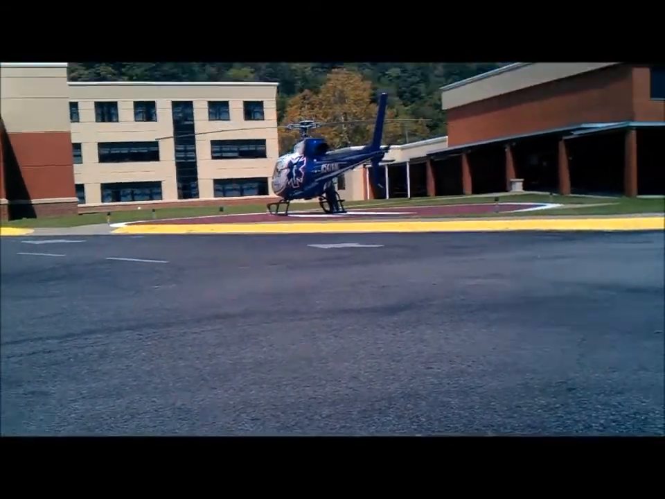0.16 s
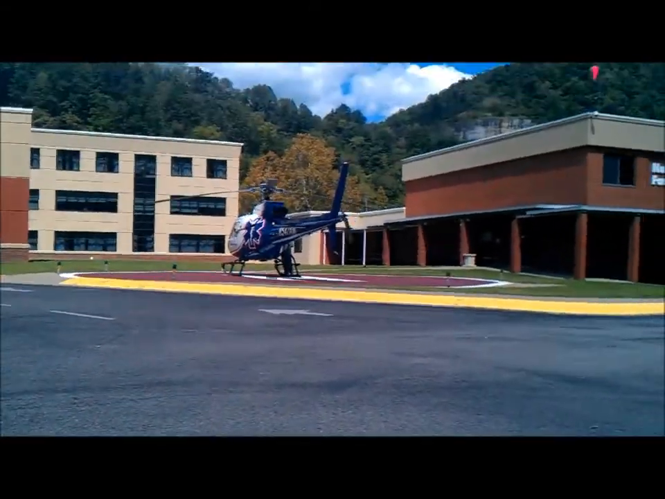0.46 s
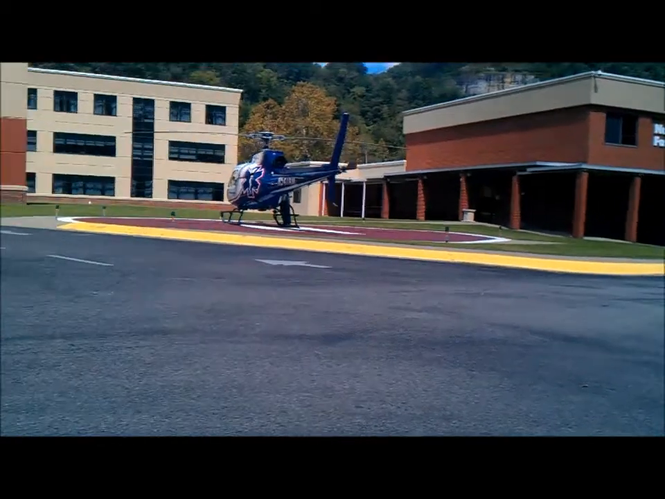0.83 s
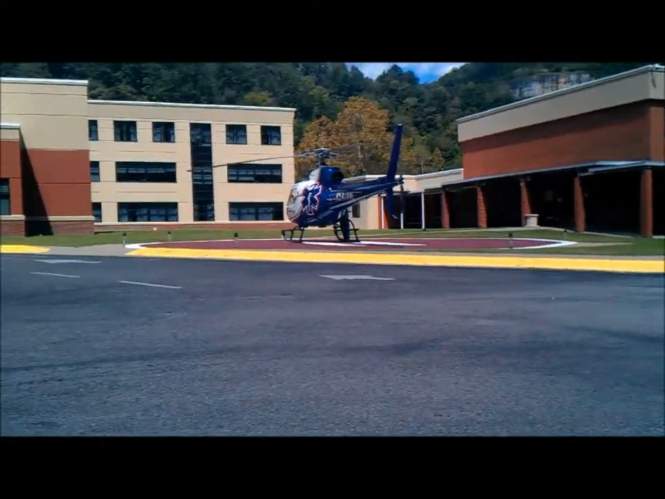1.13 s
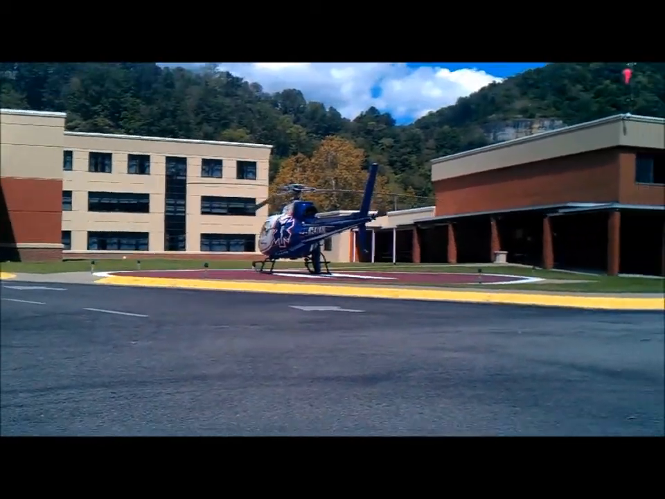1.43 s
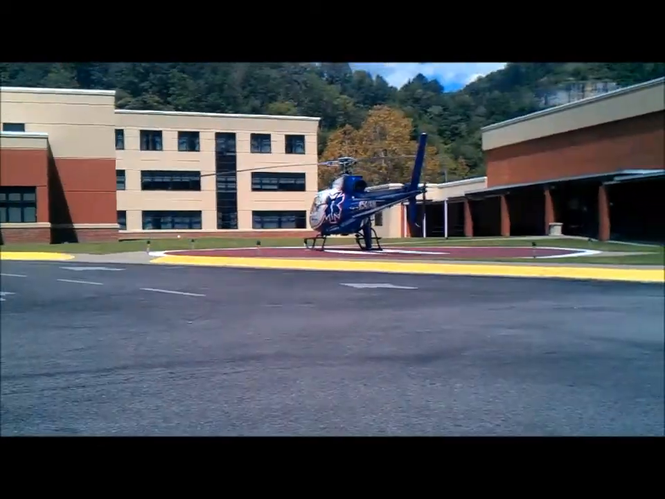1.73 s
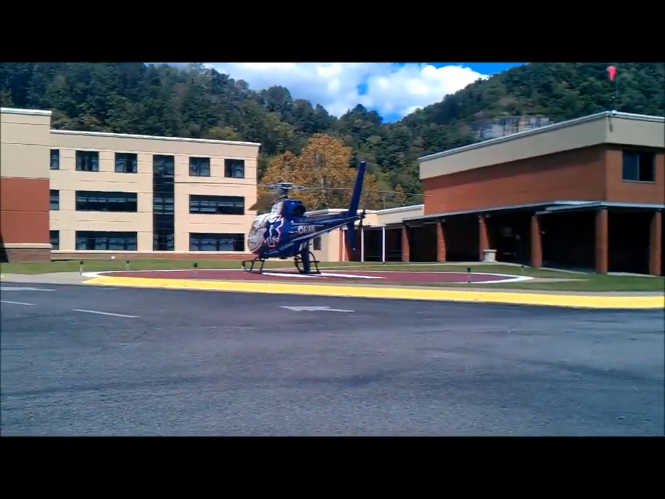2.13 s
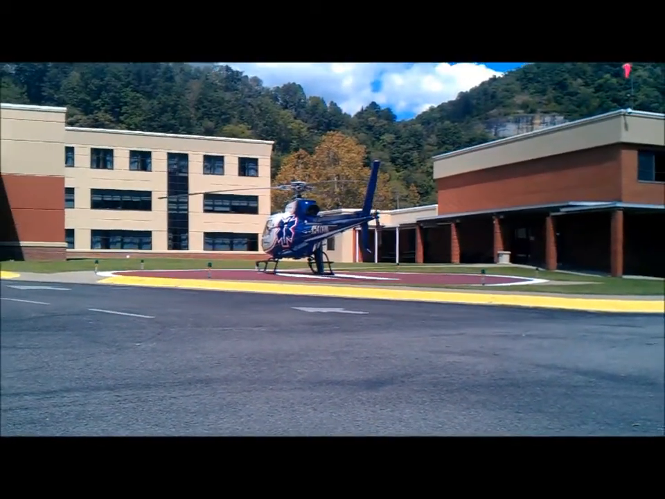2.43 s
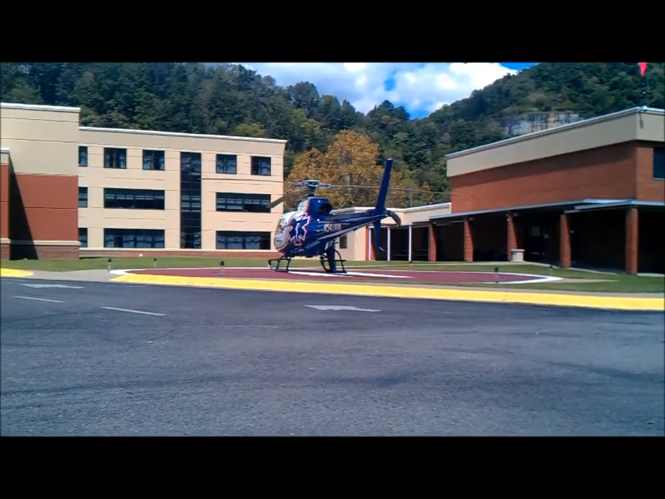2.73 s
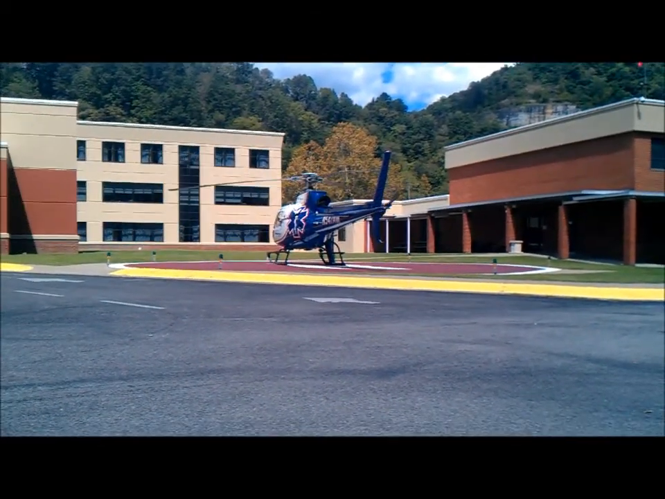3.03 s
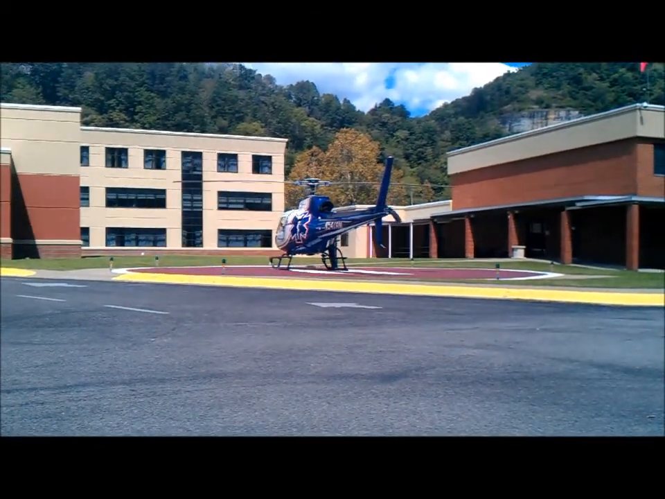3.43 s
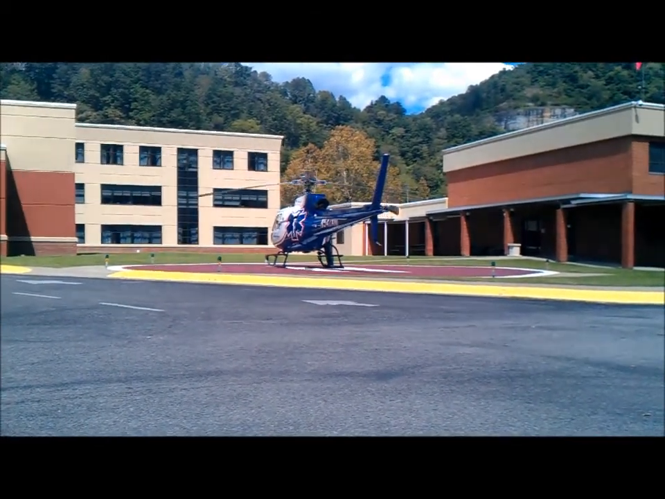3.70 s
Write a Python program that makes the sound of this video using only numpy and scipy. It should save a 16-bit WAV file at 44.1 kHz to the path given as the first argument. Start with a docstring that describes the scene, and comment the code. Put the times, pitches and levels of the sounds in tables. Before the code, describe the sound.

Helicopter turbine engine spools up outdoors, a harsh rising whine over a broad steady roar

```python
"""Helicopter spool-up

A parked helicopter spools up across a wide paved lot, heard on a hand-held mono camera.
Blade rows whine at multiples of the rising shaft speed, as wandering lines with noisy halos.
Burner rumble is a fuzzy low line; exhaust roar is shaped noise. The ground echo cuts hollows in the
roar that slide as the camera moves; faint gliding lines and a thin hum lie beneath."""
import sys
import numpy as np
from scipy import signal
from scipy.fft import rfft, irfft
from scipy.io import wavfile
from scipy.ndimage import uniform_filter1d

SR = 44100
rng = np.random.default_rng(int(sys.argv[2]) if len(sys.argv) > 2 else 0)


def log_audio(samples):
    """Write samples as a 16-bit WAV file to the path given in sys.argv[1]."""
    # one column per channel
    frames = np.atleast_2d(samples).T
    # limit to full scale, then quantise
    limited = np.clip(frames, -1, 1)
    pcm = np.round(limited * 32767).astype(np.int16)
    wavfile.write(sys.argv[1], SR, pcm)


N = 170226

# common time points of slow level changes: [t/s]
SLOW_TIMES_S = [0, 1.3, 2.3, 3.86]


def amp(db):
    """dB to amplitude factor."""
    return 10 ** (np.asarray(db) / 20)


def evened(x):
    """Scale to rms 1."""
    return x / np.sqrt(np.mean(np.abs(x) ** 2) + 1e-20)


def curve(table, t):
    """Every column of a time table, read at times t."""
    rows = np.transpose(table)
    return [np.interp(t, rows[0], column) for column in rows[1:]]


def bell(hz, centre_hz, half_width_oct):
    """Gaussian weight on a log-frequency axis, 1 at the centre, 1/e at the half width."""
    return np.exp(-(np.log2(hz / centre_hz) / half_width_oct) ** 2)


def drift(width_hz):
    """Slow complex noise of rms 1: white noise through a double pole."""
    pole = np.exp(-np.pi * max(width_hz, .1) / SR)
    noise = rng.standard_normal(N) + 1j * rng.standard_normal(N)
    return evened(signal.lfilter([(1 - pole) ** 2], [1, -2 * pole, pole * pole], noise))


def tone(hz, width_hz, halo):
    """Line with phase wander from gusty air, plus a noisy halo holding that share of power; rms about 1."""
    wander_rad, wander_share = 1.3, .2  # rms at full halo; wander bandwidth / halo width
    halo = np.clip(halo, 0, 1)
    carrier = np.exp(2j * np.pi * (np.cumsum(hz) / SR + rng.random()))
    wander = np.sqrt(2) * drift(wander_share * width_hz).real
    line = np.exp(1j * wander_rad * halo * wander)
    envelope = np.sqrt(1 - halo) * line + np.sqrt(halo) * drift(width_hz)
    return np.sqrt(2) * (carrier * envelope).real


def shaft_hz(t):
    """Shaft speed: cubic run-up plus pitch slips as the hand-held camera moves."""
    # pitch slip: [t/s, added shaft f/Hz]
    slip = [(0, -.2), (.3, -.6), (.6, -.15), (.9, .15), (1.2, .05), (2.1, .05), (3, -.05), (3.3, -.2),
            (3.6, -.2), (3.86, -.4)]
    start_hz, gain_hz_per_s, bend_hz_per_s2, surge_hz_per_s3 = 285.0, 10.126, -.4431, .1260
    run_up = start_hz + gain_hz_per_s * t + bend_hz_per_s2 * t ** 2 + surge_hz_per_s3 * t ** 3
    return run_up + curve(slip, t)[0]


def hum(t):
    """Thin fixed-pitch hum with a narrow halo, fading out linearly about halfway."""
    hum_hz, hum_db, fade_start_s, fade_s = 550.5, -44, 1.8, .4
    fade = np.clip((fade_start_s - t) / fade_s + 1, 0, 1)
    return amp(hum_db) * fade * tone(hum_hz + 0 * t, 6.2, 0.22)


def faint_lines(t):
    """Weak lines gliding with the shaft speed, plus a brief narrow band near 4.5 kHz at the start."""
    # pitch, the last row being the brief band: [f / shaft f]
    ratios = [33, 19.165, 23, 15.62]
    # mean level, one row per ratio: [level/dB at each of SLOW_TIMES_S]
    line_levels_db = [(-62, -53, -50, -48), (-45, -38, -44, -52), (-46, -47, -48, -42),
                      (-35, -54, -60, -60)]
    waver_rms_db = 2.5
    shaft = shaft_hz(t)
    out = np.zeros(N)
    for ratio, levels_db in zip(ratios, line_levels_db):
        waver = evened(uniform_filter1d(drift(26.0).real, size=2000))
        level_db = np.interp(t, SLOW_TIMES_S, levels_db) + waver_rms_db * waver
        out = out + amp(level_db) * tone(ratio * shaft, 24.0, 0.43)
    return out


def burner(t):
    """The combustion chamber hums a fuzzy low note that clears as the flame settles."""
    # resonance pitch: [t/s, f/Hz]
    pitch_table = [(0, 190), (.76, 195), (1.05, 198), (1.85, 198), (2.5, 200), (2.66, 205), (2.9, 200),
                   (3.0, 204), (3.2, 196), (3.4, 208), (3.65, 201), (3.86, 205)]
    # resonance level: [t/s, level/dB]
    level_table = [(0.0, -30), (0.55, -47), (0.77, -23.5), (0.83, -34), (0.97, -25), (1.0, -40),
                   (1.05, -24.5), (1.14, -37), (1.18, -27), (1.49, -39), (1.9, -24.5), (1.97, -41),
                   (2.15, -30.5), (2.22, -45), (2.28, -33), (2.56, -32.5), (2.69, -20), (2.73, -28),
                   (2.78, -19), (2.82, -35), (2.94, -23), (2.99, -34), (3.27, -24.5), (3.44, -30.5),
                   (3.51, -23.0), (3.61, -31), (3.66, -22), (3.85, -23)]
    # halo share of power: [t/s, share/0-1]
    halo_table = [(0, .6), (2.4, .55), (2.65, .25), (3.86, .25)]
    width_hz = 34
    pitch_hz, halo = curve(pitch_table, t)[0], curve(halo_table, t)[0]
    return amp(curve(level_table, t)[0]) * tone(pitch_hz, width_hz, halo)


def roar():
    """Exhaust noise from random short-time spectra: swelling bands, sliding echo hollows, patches, colour."""
    # exhaust colour, scaled to the roar level later: [f/Hz, relative density/dB]
    colour = [(12, -60), (20, -40), (45, -26.5), (100, -24), (150, -15), (185, -8), (240, -6.5),
              (315, -6.5), (362, -16), (534, -18.5), (614, -23), (788, -18), (1070, -21.5), (1160, -21.5),
              (1300, -19), (1920, -17), (2270, -19), (2540, -17.5), (3260, -18.5), (4070, -16), (5100, -21),
              (6000, -19.5), (7110, -19), (8880, -23.5), (9900, -21.5), (11100, -29.5), (13000, -36.5),
              (14200, -41), (15600, -69)]
    # swells, relative: [t/s, roar/dB, band near 4 kHz/dB, 5-8 kHz/dB, treble near 11 kHz/dB]
    swell = [(0, -4.5, -3, 0.5, -5), (.24, -1.5, 0, 4.5, -4), (.4, 0.5, -0.5, 4, -8),
             (.7, 1.5, -1, -2.5, -3.5), (.85, 1.5, -1, 0, -14), (1, -1, -4, 7.5, -12), (1.19, 0, -1, 8, -8),
             (1.27, 0, -3, 5.5, -10), (1.36, 1, 2, 2, -3), (1.56, -1, -1, 1.5, -3.5), (1.66, 1, -6, 1, -8),
             (1.84, 0, -1.5, 2.5, -8), (1.98, 1, 3, 6, -1.5), (2.1, 2, 3.5, 2, 1), (2.2, -3, 3, 3.5, 7),
             (2.32, 2, 3, 2.5, 0), (2.5, 1.5, 3, 3.5, 0), (2.86, 2, 5, 0, -1.5), (3.1, 1.5, 3.5, 2.5, -1),
             (3.3, 2.5, 3, 0.5, -0.5), (3.55, 2, 2, 0, 0), (3.86, 1, 2.5, 1.5, -2)]
    # swelling bands: [centre f/Hz, half width/oct]
    swell_bands = [(4150, 0.15), (6300, 0.54), (10900, 0.32)]
    # slow bands: [centre f/Hz, half width/oct, then extra level/dB at each of SLOW_TIMES_S]
    slow_bands = [(260, 1, 1.5, 0.4, 1.4, 1.6), (855, 1, 1, 0.1, 1.6, 1.1), (1890, 0.91, 0, 2.5, 0, -0.5),
                  (2600, 0.12, -5.5, 4, 0, 2), (4800, 0.056, 4, 0.5, -0.5, -3),
                  (7400, 0.068, -0.5, 5, 0.5, 6), (8980, 0.053, 14, 3, 6.5, -1),
                  (13400, 0.09, -4, -3, 3, -1), (15100, 0.092, 10, 2, -3, -20)]
    # ground-echo hollows, a table each: [t/s, centre f/Hz, level/dB (negative cuts)]
    hollows = [
        [(0, 2330, 3), (.2, 2840, -3), (.3, 3250, -9), (.45, 3570, -7), (.55, 3900, -12), (.62, 4760, -9),
         (.7, 5650, -0.5), (.8, 6250, -3), (.95, 6850, -8), (1.08, 6900, -7.5), (1.2, 5900, -5), (1.5, 4930, 5)],
        [(0, 3600, 0), (.6, 3370, -7.5), (.8, 3730, -5.5), (1.1, 4660, -5), (1.25, 4200, -5.5),
         (1.4, 3660, -6.5), (1.7, 4300, -3), (1.92, 3680, -4), (2.3, 3380, -2.5), (3.86, 3250, -1)],
        [(0, 8200, 5), (.1, 7800, -5), (.2, 6240, -5), (.3, 5800, -1)],
    ]
    roar_db, hollow_oct = -19.0, 0.26
    steady_below_hz = 410  # rumble below hardly follows swells and patches
    patch_rms_db = 1.0

    frames, hz = N // 128 + 5, np.fft.rfftfreq(512, 1 / SR)[:, None] + 1  # +1 Hz avoids log of 0
    t = np.arange(frames) * 128 / SR
    real, imag, patches = rng.standard_normal((frames, 257, 3)).T
    patches = uniform_filter1d(patches, size=6, axis=0)  # over frequency
    patches = evened(uniform_filter1d(patches, size=24, axis=1))  # over time

    level_db, *band_levels_db = curve(swell, t)
    field_db = (level_db + patch_rms_db * patches) / (1 + (steady_below_hz / hz) ** 2)
    for (centre_hz, octaves), extra_db in zip(swell_bands, band_levels_db):
        field_db = field_db + extra_db * bell(hz, centre_hz, octaves)
    for centre_hz, octaves, *extra_db in slow_bands:
        field_db = field_db + np.interp(t, SLOW_TIMES_S, extra_db) * bell(hz, centre_hz, octaves)
    for hollow in hollows:
        centre_hz, depth_db = curve(hollow, t)
        field_db = field_db + depth_db * bell(hz, centre_hz, hollow_oct)
    spectra = (real + 1j * imag) * amp(field_db)
    moving = signal.istft(spectra, nperseg=512, noverlap=384)[1][:N]

    colour_hz, colour_db = np.transpose(colour)
    fine_hz = np.fft.rfftfreq(N, 1 / SR) + 1
    colour_gain = amp(np.interp(np.log(fine_hz), np.log(colour_hz), colour_db))
    return amp(roar_db) * evened(irfft(rfft(moving) * colour_gain, N))


def blades(t):
    """Each blade row sings at its multiple of the shaft speed; broad hiss surrounds the first row."""
    # blade rows: [passes per shaft turn, halo width/Hz, base halo share/0-1]
    blade_rows = [(31, 100, .82), (27, 55, .72), (22, 16, .15), (11, 18, .2), (44, 26, .3)]
    # level, a table per blade row in that order: [t/s, level/dB]
    row_levels = [
        [(0.0, -25), (0.07, -25), (0.11, -30.0), (0.15, -19), (0.22, -28), (0.26, -19.0), (0.42, -25),
         (0.48, -20.0), (0.53, -27), (0.77, -27), (0.81, -34.5), (0.92, -30.5), (0.97, -34.5), (1.08, -22),
         (1.3, -25.5), (1.34, -20), (1.59, -23), (1.65, -34), (1.75, -29), (1.8, -34.0), (1.84, -26),
         (2.0, -30), (2.07, -20), (2.1, -24.0), (2.14, -19.5), (2.21, -17.5), (2.36, -23), (2.44, -20.5),
         (2.53, -26), (2.57, -20), (2.66, -26.5), (2.81, -24), (2.94, -30), (3.15, -22.5), (3.19, -26.5),
         (3.24, -20), (3.27, -28.5), (3.42, -25.0), (3.46, -31.5), (3.65, -24.5), (3.72, -30), (3.85, -27)],
        [(0.0, -39), (0.19, -30), (0.29, -48), (0.38, -26), (0.51, -30), (0.55, -45), (0.75, -35), (0.9, -26.5),
         (1.04, -38), (1.23, -24.5), (1.28, -37), (1.37, -27), (1.62, -32), (1.85, -29), (2.04, -33.5),
         (2.09, -33), (2.18, -31), (2.29, -29), (2.34, -27), (2.54, -37), (2.6, -37), (2.89, -42), (3.32, -38),
         (3.85, -44)],
        [(0.0, -41), (0.14, -32.5), (0.19, -51), (0.26, -41), (0.56, -45), (0.62, -40), (0.81, -52),
         (1.05, -39), (1.09, -48.0), (1.26, -25), (1.33, -44), (1.58, -28), (1.65, -42), (2.02, -28),
         (2.16, -42), (2.35, -40), (2.41, -46), (2.54, -32), (2.8, -48.0), (2.87, -27), (3.07, -26),
         (3.21, -28), (3.32, -36), (3.37, -50), (3.5, -31.0), (3.85, -34)],
        [(0, -41), (0.5, -53), (0.62, -43), (0.88, -43), (1.15, -38), (1.35, -42), (1.57, -38), (2.0, -37),
         (2.38, -37), (2.56, -42), (2.9, -38), (3.04, -31.5), (3.2, -40), (3.34, -32), (3.5, -36.5),
         (3.85, -33.5)],
        [(0.0, -57.0), (1.27, -64), (1.45, -47.0), (1.58, -53.0), (1.62, -46.0), (1.79, -57.0), (1.88, -41.0),
         (1.95, -37), (2.05, -46), (2.1, -39.0), (2.15, -39), (2.22, -59.0), (2.48, -46), (2.69, -61.0),
         (2.84, -47.0), (2.94, -74), (2.98, -51.0), (3.12, -47), (3.24, -66.0), (3.34, -49.0), (3.4, -57),
         (3.48, -46.0), (3.69, -61), (3.85, -50)],
    ]
    # purity, low = purer whine: [t/s, factor on halo share]
    purity_table = [(0, 1), (2.06, 1), (2.12, .25), (2.28, .25), (2.36, 1), (3.86, 1)]
    skirt_width_hz, skirt_db = 700, -10  # hiss level relative to the first row
    shaft = shaft_hz(t)
    halo_factor = curve(purity_table, t)[0]
    gains = [amp(curve(levels, t)[0]) for levels in row_levels]
    out = np.zeros(N)
    for (passes, width_hz, halo), gain in zip(blade_rows, gains):
        out = out + gain * tone(passes * shaft, width_hz, halo * halo_factor)
    skirt = tone(blade_rows[0][0] * shaft, skirt_width_hz, 0.92)
    return out + gains[0] * amp(skirt_db) * skirt


def scene():
    """Sum of all sources, alike on both channels."""
    t = np.arange(N) / SR
    mono = hum(t) + faint_lines(t) + burner(t) + roar() + blades(t)
    return np.tile(mono, (2, 1))


def record(dry):
    """The microphone saturates gently; then the band limit of the camera."""
    headroom, edge_hz = 1.3, 15650  # headroom: saturation amplitude
    soft = headroom * np.tanh(dry / headroom)
    lowpass = signal.firwin(511, edge_hz, window=("kaiser", 9), fs=SR)
    return signal.oaconvolve(soft, lowpass[None], "same")


dry = scene()
out = record(dry)
log_audio(out)
```